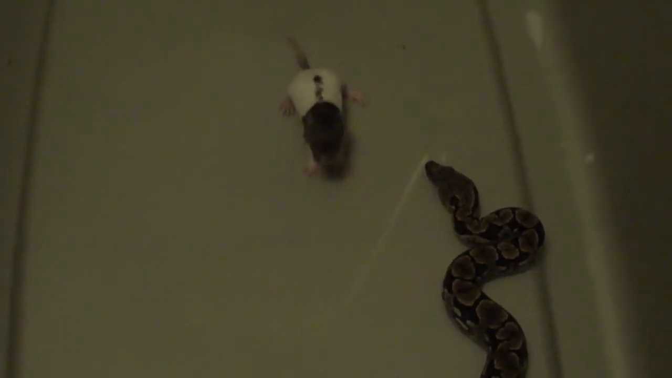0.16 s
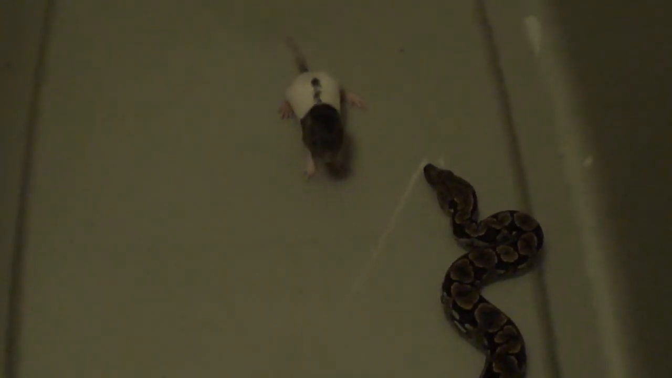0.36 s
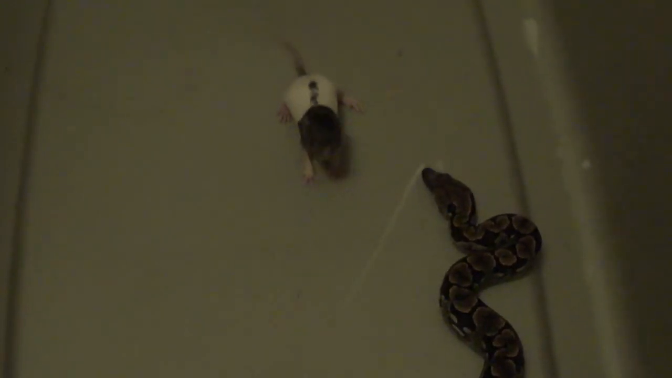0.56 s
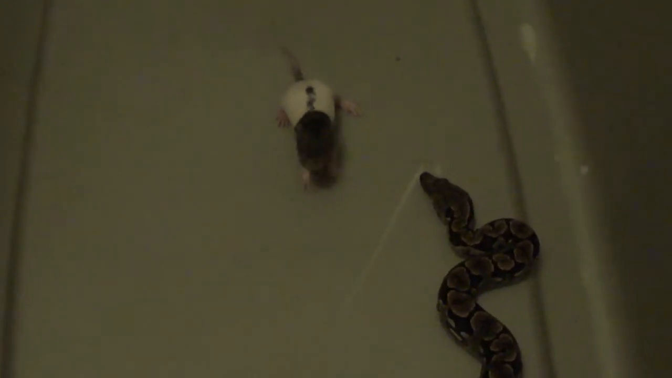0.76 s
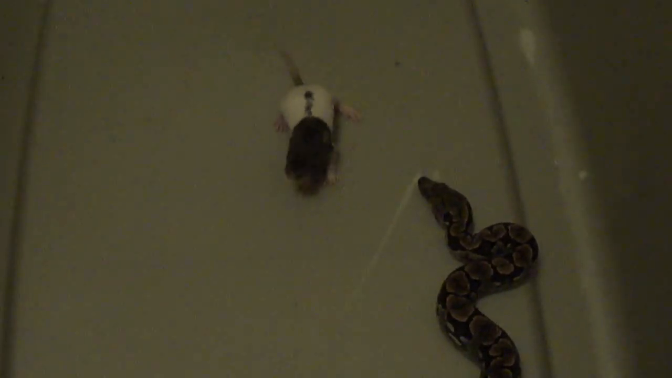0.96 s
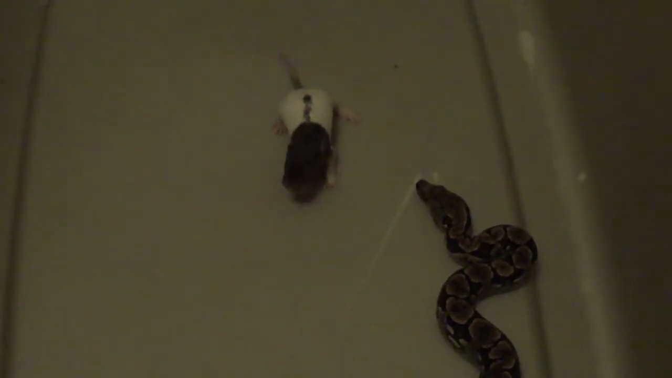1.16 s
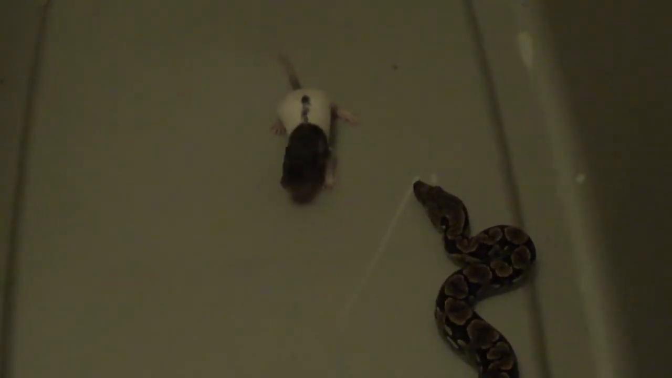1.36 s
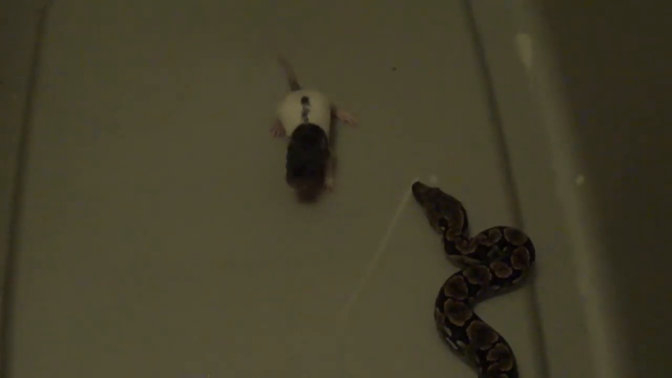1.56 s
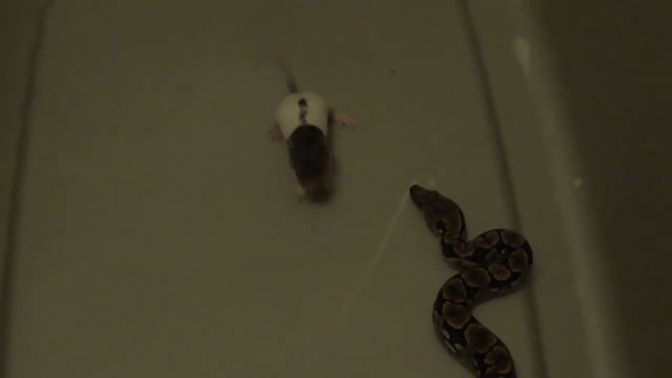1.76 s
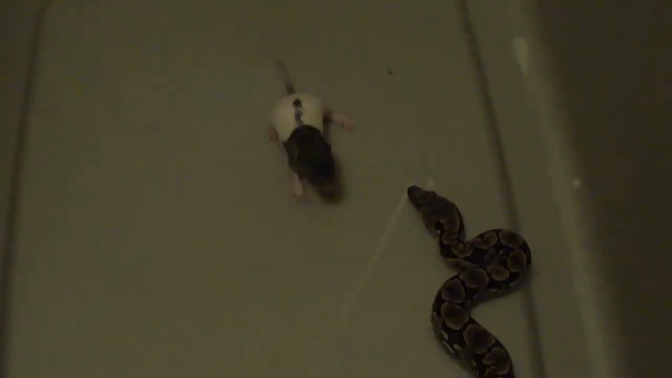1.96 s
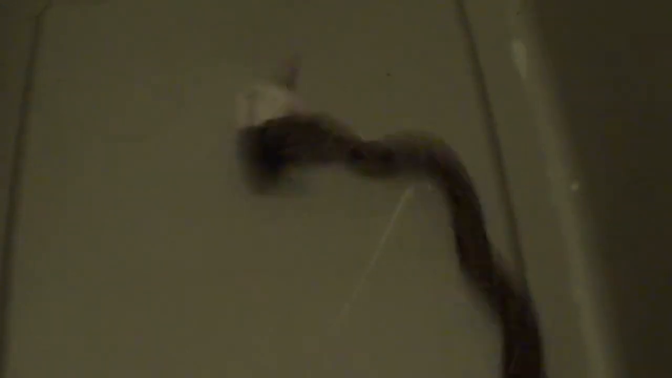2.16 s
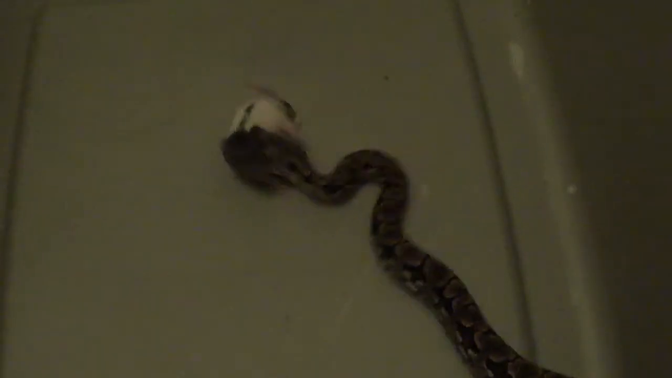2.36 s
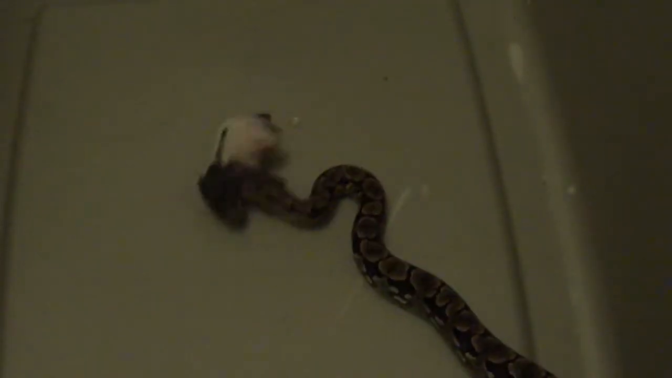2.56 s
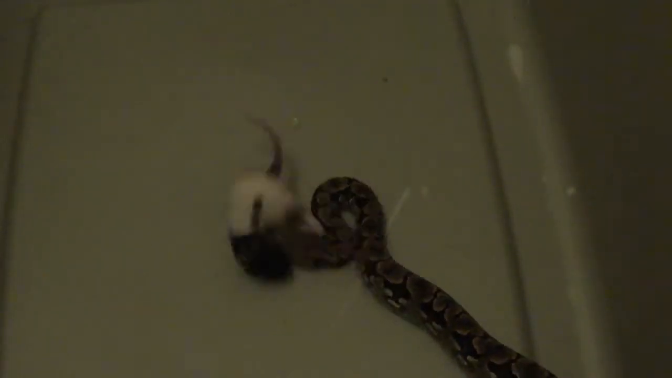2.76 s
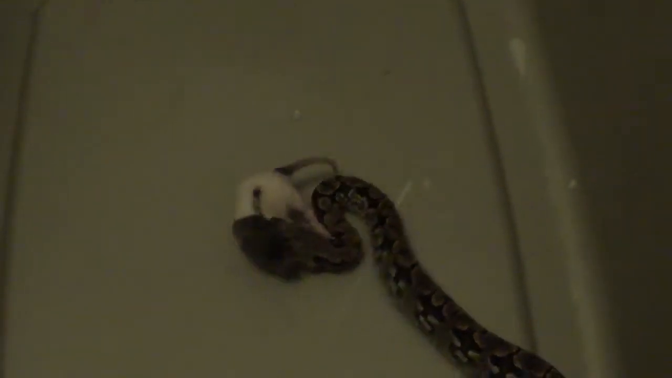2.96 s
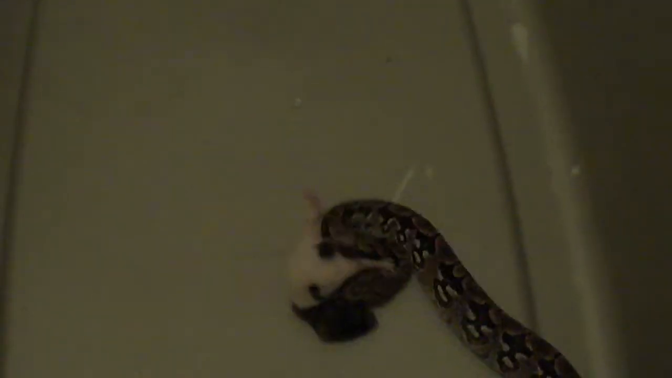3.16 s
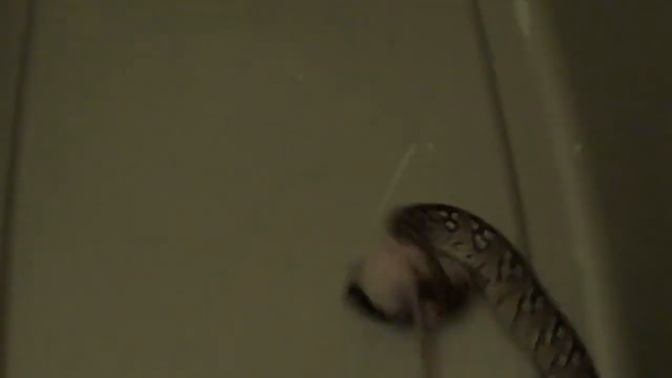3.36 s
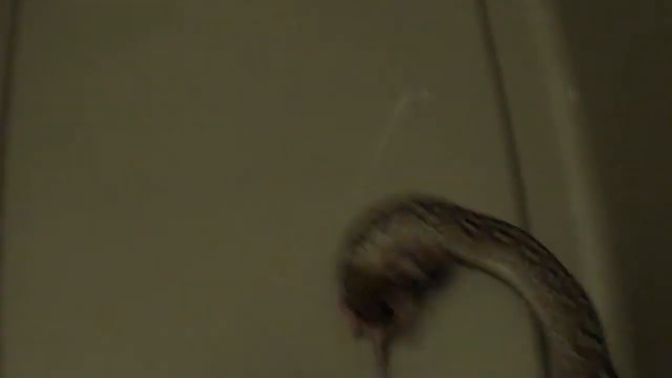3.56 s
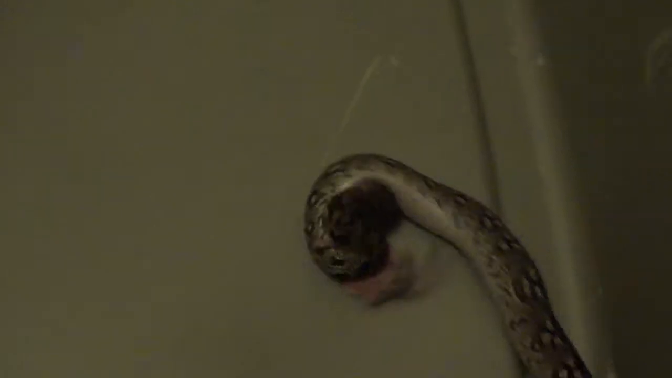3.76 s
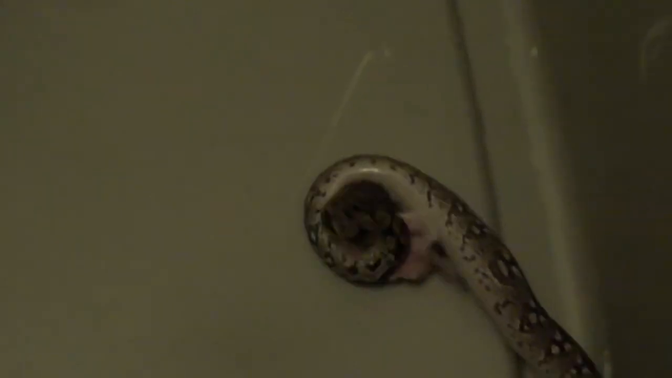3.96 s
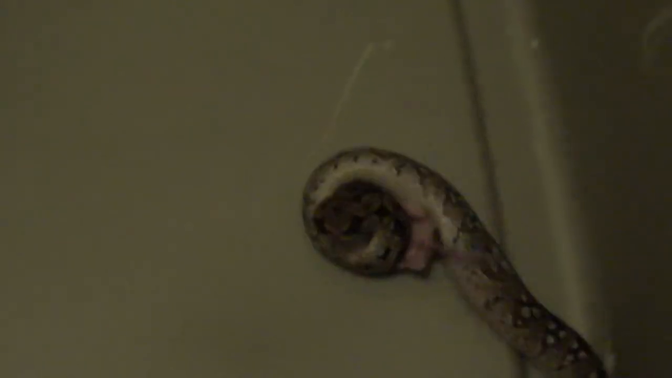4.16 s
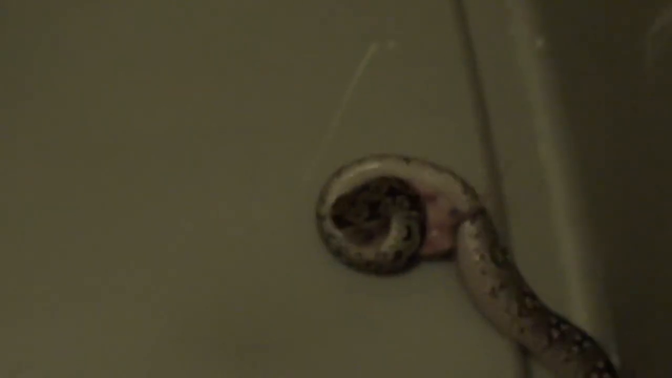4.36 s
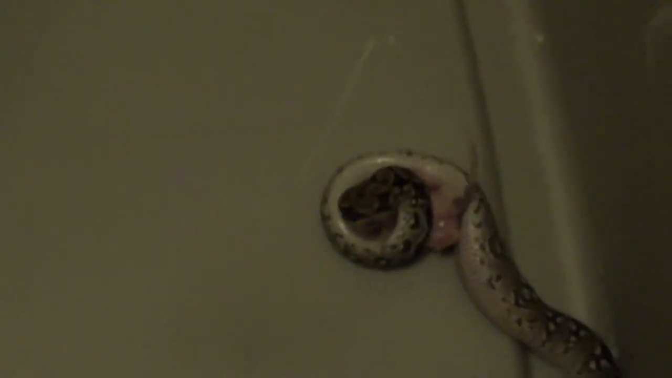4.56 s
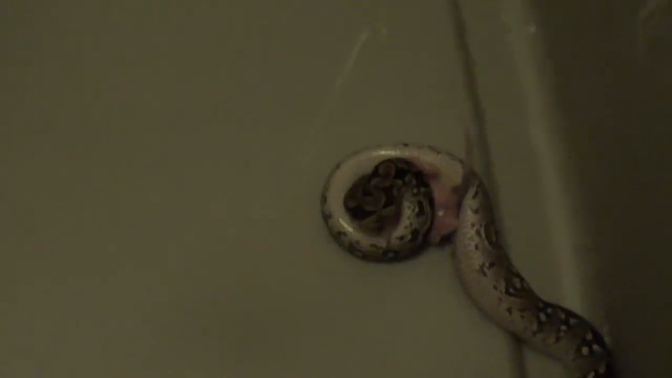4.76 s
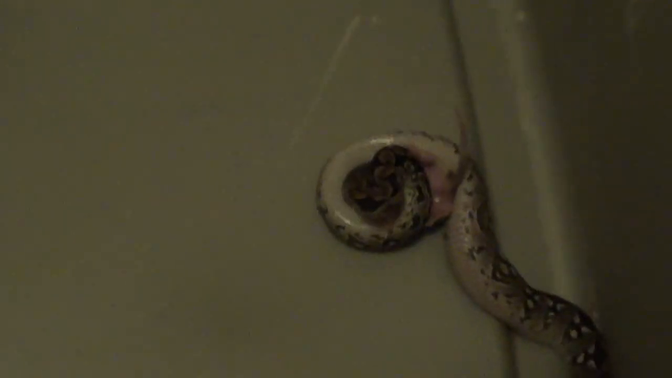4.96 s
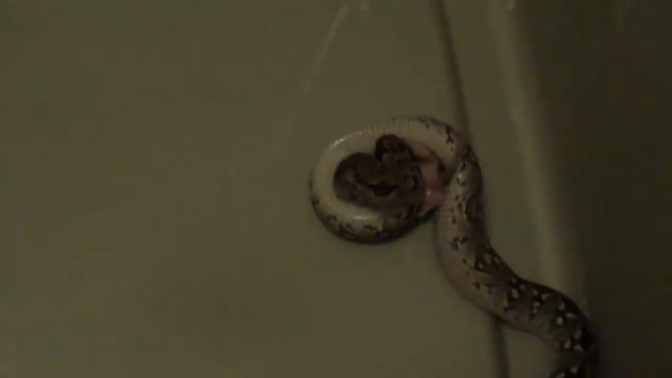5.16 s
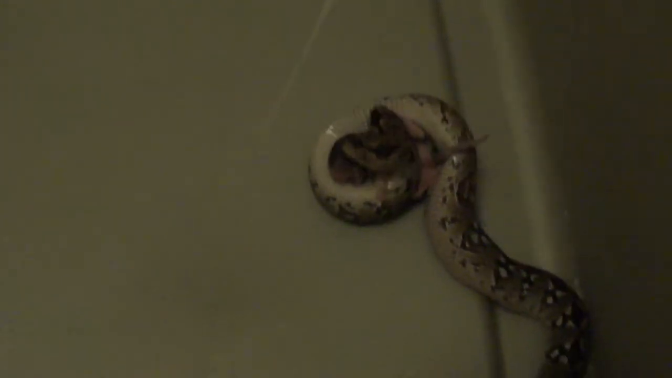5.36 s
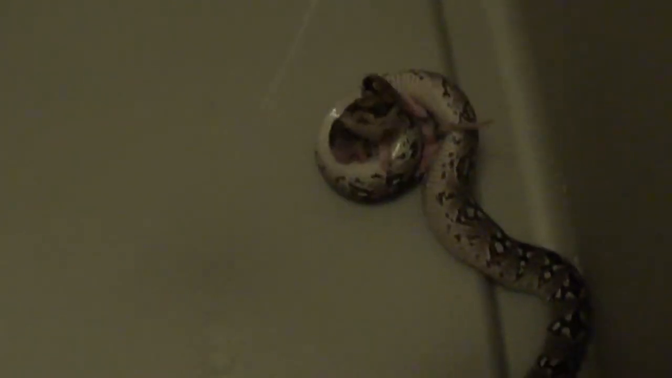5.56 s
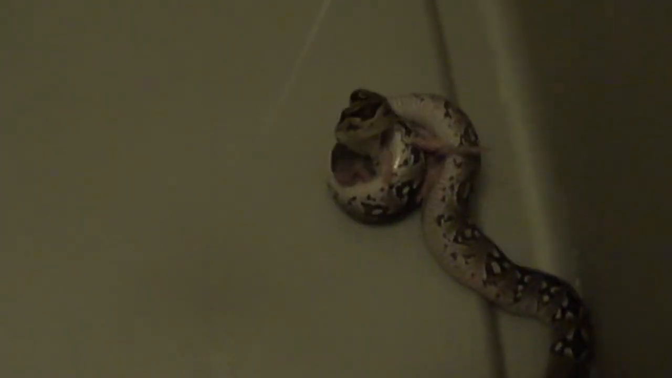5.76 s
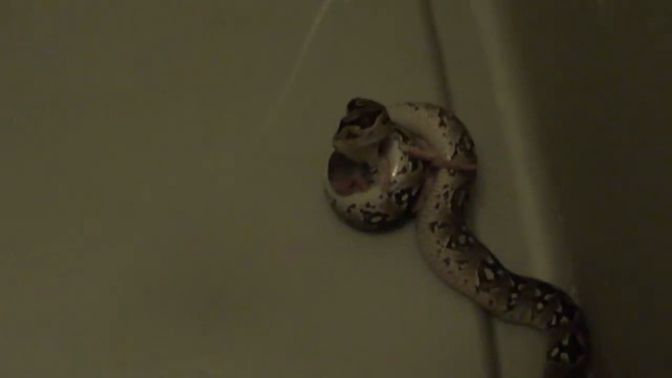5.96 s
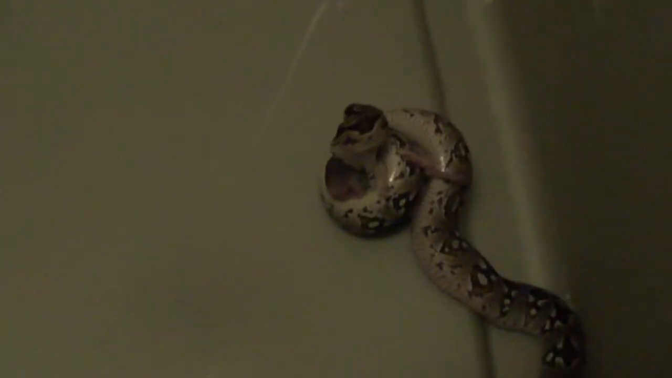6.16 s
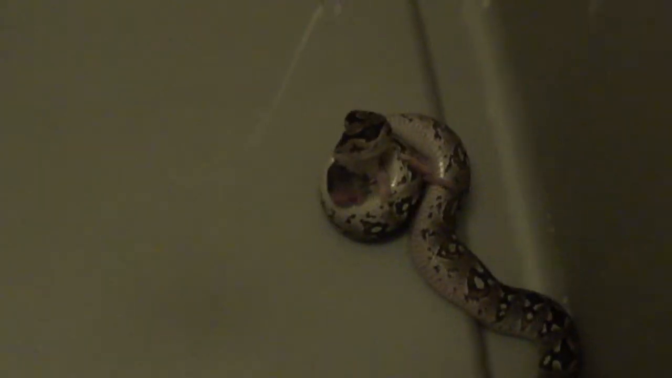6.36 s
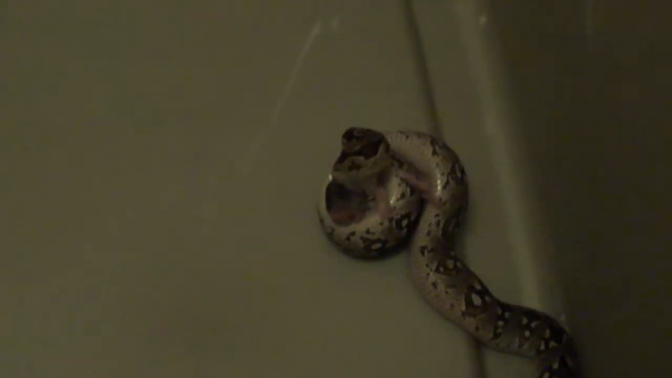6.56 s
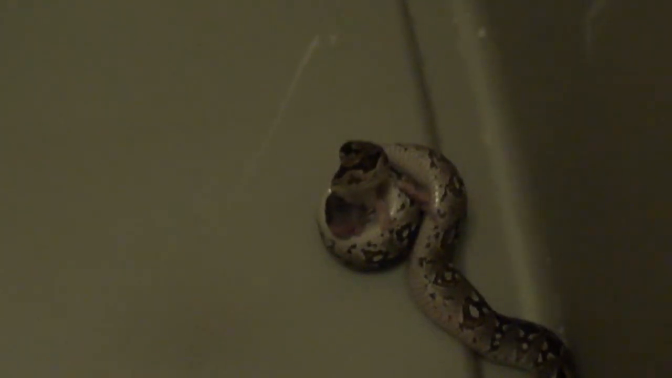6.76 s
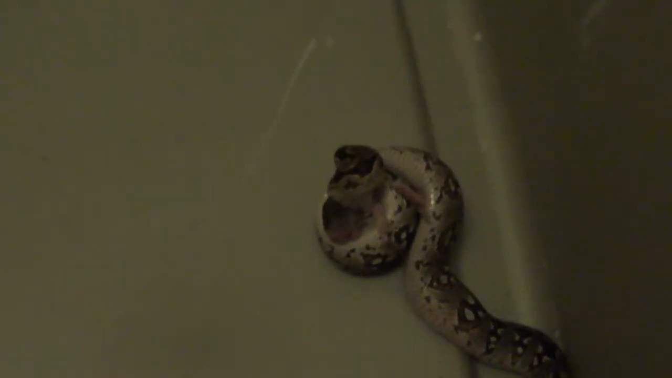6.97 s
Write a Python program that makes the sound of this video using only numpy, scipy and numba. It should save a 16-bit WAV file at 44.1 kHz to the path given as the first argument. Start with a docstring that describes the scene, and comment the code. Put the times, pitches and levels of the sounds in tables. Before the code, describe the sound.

Quiet hush, a sudden thump and scuffle, piercing fluttering rodent squeals in a resonant tub, then only sliding, scraping bodies.

```python
"""In a hard tub in a small room, a rat squeals with a fast warble while a snake seizes and coils round it.
The squeals are frequency-modulated partials under a mouth resonance, with short echoes off the tub walls.
Bodies scuff, slide and thump: friction noise and damped modes, which also set the tub ringing. Small ticks
and clicks, some in a quick even run, are brief decaying sines in noise; one claw meets the wall. A room tail
follows, and a camera hears it all over a hush of shaped noise, which its gain control pulls down under loud sound."""
import sys
import numpy as np
from scipy import signal
from scipy.fft import rfft, irfft
from scipy.io import wavfile
from scipy.ndimage import uniform_filter1d
from numba import njit

SR = 44100
rng = np.random.default_rng(int(sys.argv[2]) if len(sys.argv) > 2 else 0)


def generate_wav(sig):
    """Save sig (samples, or channels by samples) to the path in sys.argv[1] as 16-bit PCM at SR."""
    pcm = np.round(np.clip(np.atleast_2d(sig).T, -1, 1) * 32767).astype(np.int16)
    wavfile.write(sys.argv[1], SR, pcm)


N = 309008

# The modes of the tub. Each row: frequency in Hz, width in Hz, gain in dB.
TUB_MODES = [(460, 60, 0), (1130, 130, 0), (1775, 45, 2), (2380, 45, -3), (2775, 40, 1), (3860, 55, -3),
             (5320, 60, -5)]
# Seconds: the rise of a contact, also used to start it half a rise before its listed time.
CONTACT_RISE_S = .008


def undb(db):
    """A level in decibels is twenty times the logarithm of an amplitude ratio."""
    return 10 ** (np.asarray(db) / 20)


def level(x, db):
    """Mean-square scaling: gives x an rms of the stated dB."""
    return x * undb(db) / np.sqrt(np.mean(x ** 2))


def colour(points):
    """Spectral shaping: Gaussian noise of rms 1 weighted by (Hz, dB) points on a logarithmic axis."""
    point_hz, point_db = np.transpose(points)
    hz = np.arange(N // 2 + 1) * SR / N + 1
    gain = undb(np.interp(np.log(hz), np.log(point_hz), point_db, -90, -90))
    return level(irfft(rfft(rng.standard_normal(N)) * gain, N), 0)


def ring(x, hz, width):
    """Resonance: a single mode driven by x, with gain 1 at its centre."""
    return signal.lfilter(*signal.iirpeak(hz, hz / width, fs=SR), x)


def walk(rate, size=N):
    """Slow random modulation: levels held 1 / rate seconds and slewed twice, of spread near 1."""
    hold = max(int(SR / rate), 1)
    steps = np.repeat(rng.standard_normal(size // hold + 1), hold)
    return 1.3 * uniform_filter1d(uniform_filter1d(steps, hold), hold)[:size]


def add(out, s, x):
    """Superposition: sums x into out from s seconds on."""
    i = int(s * SR)
    out[..., i:i + x.shape[-1]] += x[..., :N - i]


def fall(t, t60):
    """Exponential damping: a loss of 60 dB in t60 seconds."""
    return np.exp(-np.log(1000) * t / t60)


def decay(hz, t60):
    """Free vibration: one damped mode after a contact of half a millisecond."""
    t = np.arange(int(.1 * SR)) / SR
    return np.sin(2 * np.pi * hz * t) * fall(t, t60) * np.minimum(t * 2000, 1)


@njit
def follow(x, attack, release):
    """Envelope detection: rises fast and falls slowly, each by a share of the gap per sample."""
    y, e = np.empty(len(x)), 0.
    for i in range(len(x)):
        e += (abs(x[i]) - e) * (attack if abs(x[i]) > e else release)
        y[i] = e
    return y


def hush(near):
    """Steady broadband noise of the room, reduced by the camera's gain control under loud sound."""
    # Each row: frequency in Hz, relative spectral level in dB.
    spectrum = [(12, -57), (20, -32), (117, -9), (243, -5.5), (352, -3), (522, -4.5), (981, -5),
                (1060, -6.5), (1750, -9.5), (3040, -13), (5870, -19.5), (8050, -21.5), (10800, -28.5),
                (14000, -59), (22000, -120)]
    hush_db, threshold_db, slope = -55, -35, 1
    attack_s, release_s = .0038, .13  # time constants
    loud = follow(near, 1 / (attack_s * SR), 1 / (release_s * SR))
    duck = np.maximum(loud / undb(threshold_db), 1) ** -slope
    return duck * undb(hush_db + .23 * walk(3.9)) * colour(spectrum)


def room(near):
    """Diffuse reverberation: convolution with exponentially decaying noise after a 6 ms gap."""
    t60_s, room_db = .22, -14.5
    t = np.arange(int(.6 * SR)) / SR
    tail = rng.standard_normal(len(t)) * fall(t, t60_s) * (t > .006)
    return signal.fftconvolve(near, level(tail, room_db) / np.sqrt(len(t)))[:N]  # energy sums to room_db


def tick_run():
    """Periodic excitation: an even run of ticks whose pitch goes round four steps, as rows like the clicks."""
    # Each row: pitch in Hz, level in dB relative to the run.
    run_steps = [(3830, 4), (5150, 4.5), (3600, 3), (2900, 0)]
    start_s, per_s, count = 1.9425, 59.8, 12
    run_db, scatter_db, t60_s = -46, 1.5, .008
    return [(start_s + k / per_s, run_db + db + scatter_db * rng.standard_normal(), hz, t60_s)
            for k, (hz, db) in enumerate((run_steps * count)[:count])]


def clicks():
    """Impulsive excitation: ticks that each ring briefly in a crack of noise, and one claw on the wall."""
    # Small ticks and clicks. Each row: start in seconds, level in dB, pitch in Hz, t60 in seconds.
    single_clicks = [(1.1613, -38, 3220, 0.015), (1.179, -43, 6960, 0.01), (1.238, -41, 3280, 0.029),
                     (1.9255, -35, 5060, 0.011), (2.51, -39.5, 2900, 0.021), (2.7147, -24.5, 6570, 0.03)]
    # The modes of a claw on the wall. Each row: frequency in Hz, level in dB, t60 in seconds.
    claw_modes = [(1385, -15, 0.03), (2180, -16, 0.021), (3560, -12, 0.0099), (3760, -12, 0.013),
                  (4550, -10, 0.0057)]
    claw_s = 6.868
    crack_hz, crack_width_hz, crack_db, crack_t60_s = 4500, 2200, -6, .014  # dB relative to the click
    out = np.zeros(N)
    t = np.arange(int(.1 * SR)) / SR
    for s, db, hz, t60 in single_clicks + tick_run():
        crack = ring(rng.standard_normal(len(t)), crack_hz, crack_width_hz)
        crack = level(ring(crack, crack_hz, crack_width_hz), crack_db)
        add(out, s, undb(db) * (decay(hz, t60) + crack * fall(t, crack_t60_s)))
    add(out, claw_s, sum(undb(db) * decay(hz, t60) for hz, db, t60 in claw_modes))
    return out


def tub(x):
    """Modal superposition: the resonances of the tub in parallel."""
    return sum(undb(db) * ring(x, hz, width) for hz, width, db in TUB_MODES)


def push(db, t60):
    """Contact pressure: rise, hold, exponential decay; long contacts build more slowly."""
    rise = CONTACT_RISE_S + .04 * t60
    hold_end = rise + .11 * t60
    t = np.arange(int((hold_end + t60) * SR)) / SR
    return np.clip(t / rise, 0, 1) * fall(np.maximum(t - hold_end, 0), t60) * undb(db)


def slide():
    """Sliding friction: its power against time in three rows, middle, treble and bass."""
    # Bodies sliding. Each row: time in seconds, level in dB.
    slide_levels = [(2.12, -60), (2.2, -41.5), (2.324, -42), (2.526, -58.5), (2.664, -51), (2.72, -65),
                    (2.924, -55.5), (3.122, -71), (3.272, -47.5), (3.484, -49.5), (3.618, -29.5),
                    (3.694, -34), (3.868, -60.5), (4.114, -56.5), (4.264, -41.5), (4.392, -61.5),
                    (4.7, -54), (4.78, -35.5), (4.92, -41), (5.52, -39), (6.22, -41.5), (6.55, -38),
                    (6.67, -26), (6.82, -39.5), (7.01, -41)]
    treble_db, bass_db = -10.5, -17  # relative to the middle
    s, db = np.transpose(slide_levels)
    pressure = undb(np.interp(np.arange(N) / SR, s, db, -90))
    return (pressure * undb([[0], [treble_db], [bass_db]])) ** 2


def add_scuffs(power, rung):
    """Transient friction: scuffs and kicks add power to the bands and drive the tub modes with noise."""
    # Each row: time in seconds, level in dB, treble in dB relative to it, where the tub rings most in Hz,
    # ring in dB relative to the level, t60 in seconds.
    scuff_rows = [(0.388, -57.5, -17, 993, -1, .12), (0.413, -52, -21, 980, 0, 0.11),
                  (0.491, -52, -15, 970, 4.5, .13), (0.569, -57.5, -16, 920, 1, 0.15),
                  (0.969, -67, 3, 770, -1, 0.11), (1.027, -64, -14, 1060, 10, 0.072),
                  (2.149, -37.5, -14.5, 888, -27, 0.29), (2.183, -34, -24, 450, 0, 0.071),
                  (2.235, -29.5, -19, 482, -5.5, .09), (2.256, -45, -17, 466, -3, 0.05),
                  (2.299, -42.5, -13, 445, 2, 0.19), (2.357, -47.5, -4, 3060, -3, 0.084),
                  (2.435, -44.5, -9, 970, -35, 0.074), (2.509, -53, -32, 535, -2.5, 0.35),
                  (2.653, -54.5, 13, 2190, -10, 0.1), (3.072, -44.5, 2, 2670, -12, 0.31),
                  (3.122, -33, -17, 432, -19, .2), (3.169, -34.5, -10, 645, -12, .2),
                  (3.215, -30.5, -0.5, 1860, -12, 0.084), (3.358, -44.5, -14, 1080, 8, 0.053),
                  (3.477, -44.5, 1, 780, 4.5, 0.15), (3.58, -43.5, -3, 1040, 11.5, .1),
                  (3.623, -25, -14, 820, -27, 0.17), (3.659, -28.5, -29, 780, -7, 0.41),
                  (3.723, -27, -2, 1230, 4, 0.087), (4.096, -47, -7, 1750, -3.5, 0.29),
                  (4.238, -44, -29, 1140, 6, 0.086), (4.402, -51.5, 7, 2300, -5, 0.066),
                  (4.564, -48, -22, 2660, -2, 0.18), (4.717, -42, -0.5, 1770, -11, 0.23),
                  (4.792, -32.5, -10, 1820, 10, 0.13), (4.839, -38.5, -5.5, 2780, 8, 0.12),
                  (4.95, -41.5, -7, 1010, -2, 0.27), (5.012, -37, -3, 1027, -17, 0.21),
                  (5.137, -38, -1.5, 894, -19, 0.15), (5.232, -33.5, -3, 2510, -27, 0.16),
                  (5.299, -40, -4, 1780, 2, 0.17), (5.338, -34, -3, 980, -7, 0.12),
                  (5.444, -36, -4.5, 1090, -4, .05), (5.515, -33.5, -6.5, 1000, -2, 0.27),
                  (5.593, -40.5, -26, 1170, 11, 0.094), (5.641, -43, 4, 985, 4.5, 0.15),
                  (5.719, -42, 5, 870, -5, 0.089), (5.813, -33.5, -31, 1110, -4.5, 0.12),
                  (5.915, -33, -4, 2410, -6, .25), (5.931, -31.5, -14, 990, -10, 0.12),
                  (6.046, -37.5, -31, 1180, -21, .14), (6.26, -48.5, 9, 1810, -16, 0.075),
                  (6.39, -37.5, -29, 1690, 7, 0.1), (6.476, -36, -13, 1040, -6, 0.2),
                  (6.559, -28.5, -2, 2400, 1.5, 0.15), (6.609, -39, -13, 1300, -1, 0.086),
                  (6.667, -32, 0.5, 1190, 5.5, .09), (6.719, -34.5, -3, 1770, 3.5, 0.15),
                  (6.753, -34, -8.5, 990, -12, 0.22), (6.909, -45, 4.5, 1980, 6.5, 0.047),
                  (6.985, -29, -5.5, 1640, -13, 0.11)]
    bass_db = -26  # relative to the middle
    sharpness = 5  # centre over width of the push that rings the tub
    for s, db, treble_db, hz, ring_db, t60 in scuff_rows:
        pressure = push(db, t60)
        start = s - CONTACT_RISE_S / 2
        add(power, start, (pressure * undb([[0], [treble_db], [bass_db]])) ** 2)
        drive = ring(rng.standard_normal(len(pressure)), hz, hz / sharpness)
        add(rung, start, pressure * level(tub(drive), ring_db))


def add_thuds(power, rung):
    """Low-frequency impact: a body drops on the floor, with bass noise and an unsteady damped boom."""
    # Each row: time in seconds, level in dB, boom in Hz, t60 in seconds.
    thud_rows = [(2.183, -43.5, 226, 0.087), (2.24, -43, 228, .1), (2.669, -48, 148, 0.056),
                 (3.13, -37.5, 214, 0.11), (3.169, -47, 120, 0.065), (3.215, -41, 331, 0.089),
                 (3.476, -42, 190, 0.075), (5.233, -51, 204, 0.16), (5.813, -51, 245, 0.12),
                 (6.986, -50, 250, .12)]
    noise_db, wobble_db = -3, 4  # noise relative to the thud; spread of the boom level
    for s, db, hz, t60 in thud_rows:
        pressure = push(db, t60)
        start = s - CONTACT_RISE_S / 2
        add(power[2], start, (pressure * undb(noise_db)) ** 2)
        wobble = undb(wobble_db * walk(70, size=len(pressure)))
        boom = np.sin(2 * np.pi * hz * np.arange(len(pressure)) / SR)
        add(rung, start, np.sqrt(2) * pressure * wobble * boom)


def struggle():
    """Friction-excited resonance: dense grains in three bands follow the contacts, and the tub rings along."""
    # Rubbing noise. Each row: frequency in Hz, relative spectral level in dB.
    rub_spectrum = [(150, -30), (250, -16.5), (414, -5.5), (776, -3.5), (1110, 2), (1240, -4.5), (1790, -3),
                    (3990, -7), (7490, -12.5), (10800, -21.5), (14000, -36), (22000, -120)]
    # Bass noise of the contacts. Each row: frequency in Hz, relative spectral level in dB.
    thump_spectrum = [(30, -14), (70, -3.5), (140, 0), (220, -2), (320, 6.5), (500, 6)]
    grain_db, patch_db = 1.4, 1.2  # spreads of the fast and slow unevenness
    treble_hz, tub_ring_db = 3000, -8
    power, rung = slide(), np.zeros(N)
    add_scuffs(power, rung)
    add_thuds(power, rung)
    rub = colour(rub_spectrum) * undb(grain_db * walk(340) + patch_db * walk(40))
    middle = signal.filtfilt(*signal.butter(1, treble_hz, fs=SR), rub)
    treble = rub - middle
    thump = colour(thump_spectrum) * undb(2 * walk(30))
    pressure = np.sqrt(power)  # the powers of the contacts add
    grains = pressure[0] * level(middle, 0) + pressure[1] * level(treble, 0) + pressure[2] * thump
    # the slope drives the upper modes as hard as the lower; unity gain at the second mode
    drive = np.diff(grains, prepend=0) * SR / (2 * np.pi * TUB_MODES[1][0])
    return grains + rung + undb(tub_ring_db) * tub(drive)


def squeal(curve, warble, first_db, jitter):
    """Source and filter: partials of tight vocal folds on a warbling pitch, lifted by the mouth resonance."""
    below_hz, above_hz = 1480, 1440  # widths of the two flanks of the mouth resonance
    breath_db, wander_turns, onset_s = -20, .04, .003
    s, *columns = np.transpose(curve)
    t = np.arange(s[0], s[-1], 1 / SR)
    hz, depth, db, mouth = (np.interp(t, s, column) for column in columns)
    crest, rate, slowing = warble
    elapsed = t - crest
    turns = rate * elapsed - slowing * elapsed ** 2 / 2 + wander_turns * walk(60, size=len(t))
    sung = (hz + depth * np.cos(2 * np.pi * turns)) * (1 + jitter * walk(400, size=len(t)))
    phase = 2 * np.pi * np.cumsum(sung) / SR
    out = 0
    for k in range(1, 7):
        breath = undb(breath_db) * walk(2500, size=len(t))
        off = (k * hz - mouth) / np.where(k * hz < mouth, below_hz, above_hz)
        shape_db = first_db if k == 1 else -20 * np.log10(1 + off ** 2)
        # the level mostly holds and now and then drops out for a few milliseconds; the first is steadier
        shimmer_db = (1.5 if k == 1 else 3.5) * (.5 - walk(220, size=len(t)) ** 2)
        amplitude = np.sqrt(2) * undb(db + shape_db + shimmer_db) * (1 + breath)
        out = out + amplitude * np.sin(k * phase)
    return out * np.clip(np.minimum(t - s[0], s[-1] - t) / onset_s, 0, 1)


def rat():
    """Interference: squeals meet their wall echoes, which lag in pitch and beat against the warble."""
    # One table a squeal, or a part of one: the fourth is the rough, low end of the third.
    # Each row: time in seconds, pitch in Hz, warble depth in Hz, level in dB, mouth resonance in Hz.
    squeal_curves = [
        [(2.252, 2450, 50, -59, 6500), (2.28, 2850, 200, -57, 6500), (2.33, 2540, 250, -61, 6500)],
        [(2.384, 3000, 0, -57, 6500), (2.399, 3060, 0, -56, 6500)],
        [(2.664, 2160, 0, -41, 6000), (2.673, 2230, 3, -41, 6300), (2.688, 3005, 197, -27.5, 7250),
         (2.775, 2886, 238, -30, 6570), (2.833, 2270, 137, -30.5, 6300), (2.848, 2506, 352, -32, 6600),
         (2.918, 2570, 407, -32.5, 6700), (2.954, 2713, 144, -32.5, 7300), (3.021, 2795, 281, -33.5, 7900),
         (3.043, 2780, 150, -31.5, 7900), (3.06, 1880, 4, -41, 7900)],
        [(3.058, 1894, 0, -35.5, 7500), (3.1, 1884, 0.0045, -39, 7500), (3.125, 1920, 0, -60, 7600)],
        [(3.238, 3120, 288, -27, 6550), (3.317, 3348, 222, -29, 6360), (3.362, 2990, 163, -27.5, 6450),
         (3.422, 2720, 123, -30.5, 7400), (3.433, 2948, 88, -31, 7900), (3.492, 2134, 180, -33, 6300)],
        [(3.518, 2280, 0, -32, 6900), (3.527, 2185, 0, -26, 6700), (3.532, 2020, 0, -38, 5600),
         (3.545, 2050, 0, -31, 5200), (3.559, 2234, 0, -32, 6300), (3.569, 2080, 0, -35, 4600)],
        [(3.752, 2880, 223, -32.5, 6500), (3.834, 3166, 250, -30.5, 6900), (3.927, 3023, 254, -31.5, 6474),
         (3.978, 2920, 103, -30.5, 6900), (4.023, 2680, 245, -30, 7000), (4.057, 2686, 238, -33, 7000),
         (4.123, 2340, -2, -35.5, 6360), (4.147, 2444, -4, -29.5, 6650), (4.163, 3330, -7, -26, 7240)],
        [(4.405, 1844, -2, -22.5, 5800), (4.416, 2300, 2, -28, 5030), (4.428, 2336, 7, -26, 5000),
         (4.442, 2597, 118, -27.5, 5470), (4.512, 2780, 184, -30, 6600), (4.535, 2700, 190, -29, 6230),
         (4.552, 2495, 97, -32, 5900), (4.594, 2583, 110, -27.5, 6200), (4.607, 2370, -2, -28, 5000),
         (4.672, 2180, 13, -32, 6300), (4.685, 2420, 9, -26, 5500), (4.714, 1975, 3, -34.5, 5860)],
        [(5.026, 2060, 0, -32, 8300), (5.035, 2065, 0, -32, 8300), (5.039, 2040, 0, -54, 7500),
         (5.045, 2064, 0, -54, 7500), (5.049, 2060, 0, -34, 7100), (5.07, 2038, 0, -35, 6100),
         (5.095, 2063, 0, -31, 6600), (5.105, 2090, 0, -35, 7000)],
    ]
    # Each row, one a curve: a crest of the warble in seconds, warbles per second, slowing per second squared.
    warbles = [(2.28, 34, 0), (2.384, 36, 0), (2.6907, 42, 28), (3.064, 36, 0), (3.2338, 36, 0),
               (3.516, 36, 0), (3.755, 36.5, 15), (4.448, 34.5, 0), (5.026, 36, 0)]
    # Each row, one a curve: first partial in dB relative to the level, pitch jitter as a share.
    folds = [(16.5, 0.0057), (15, 0.0043), (-8, 0.0073), (-6, 0.029), (-12, 0.0062), (-18, 0.0065),
             (-17.5, 0.0064), (-14, 0.0057), (-11.5, 0.0062)]
    # Tub walls. Each row: delay in seconds, level in dB relative to the direct sound.
    echoes = [(.0013, -7), (.0029, -7), (.0052, -11), (.0097, -15)]
    out = np.zeros(N)
    for curve, warble, fold in zip(squeal_curves, warbles, folds):
        add(out, curve[0][0], squeal(curve, warble, *fold))
    paths = out + sum(undb(db) * np.roll(out, int(s * SR)) for s, db in echoes)
    return paths / np.sqrt(1 + sum(undb(2 * db) for s, db in echoes))  # share the power among the paths


def scene():
    """Linear superposition: the sources in the tub, their room tail and the hush, in one channel."""
    near = clicks() + struggle() + rat()
    near = near + room(near)
    return (near + hush(near))[None]


def record(dry):
    """Band limiting: the camera cuts steeply above 10.8 kHz."""
    return signal.sosfilt(signal.ellip(10, .2, 80, 10800, fs=SR, output="sos"), dry)


dry = scene()
out = record(dry)
generate_wav(out)
```